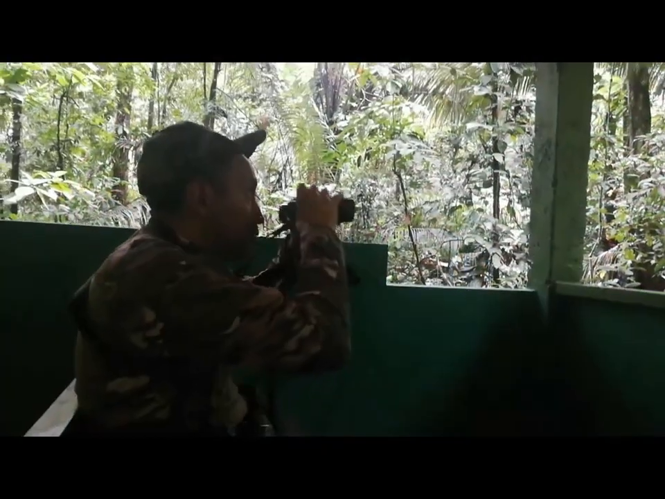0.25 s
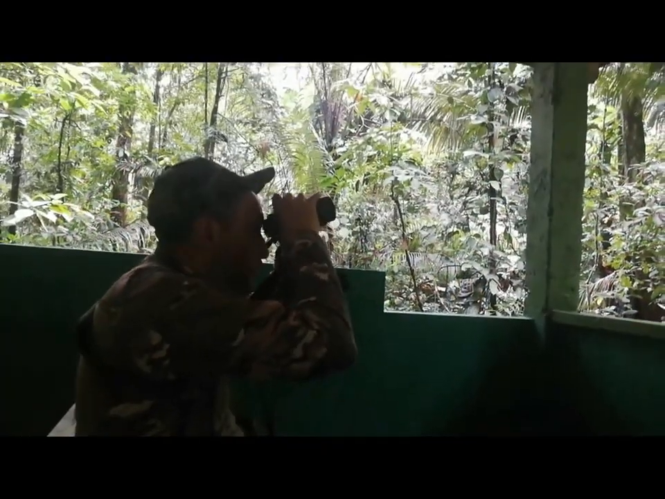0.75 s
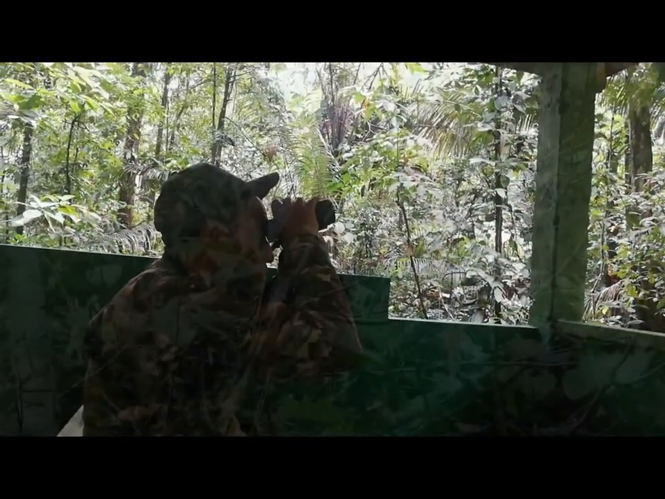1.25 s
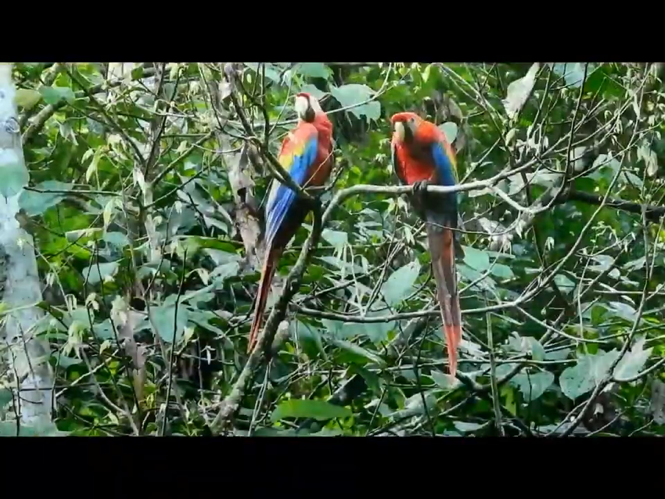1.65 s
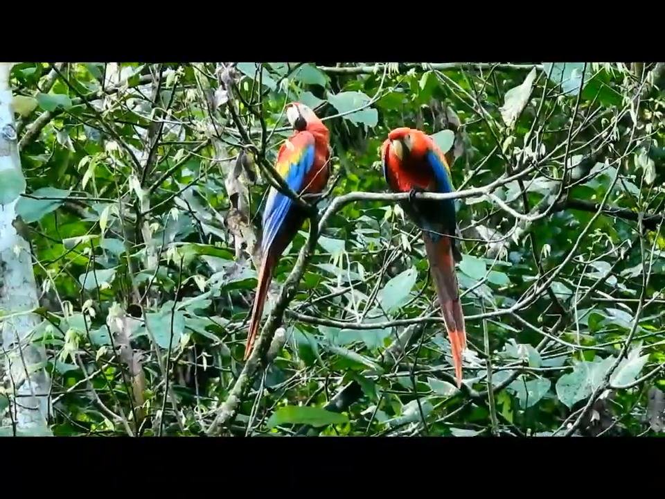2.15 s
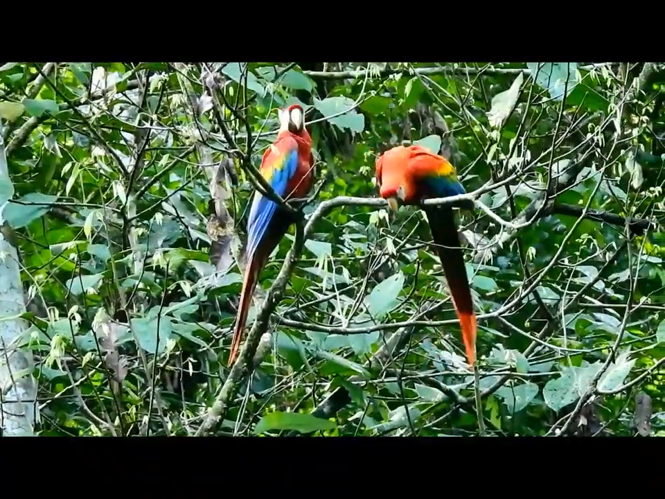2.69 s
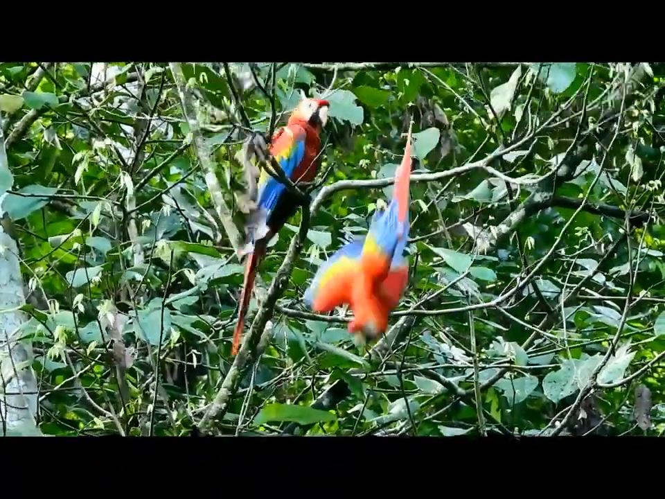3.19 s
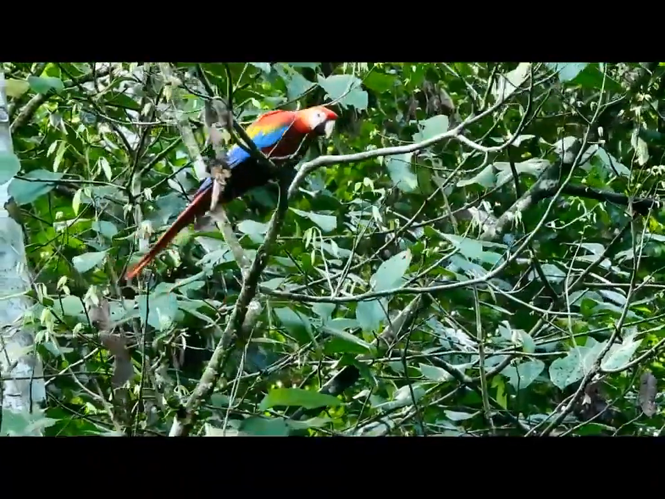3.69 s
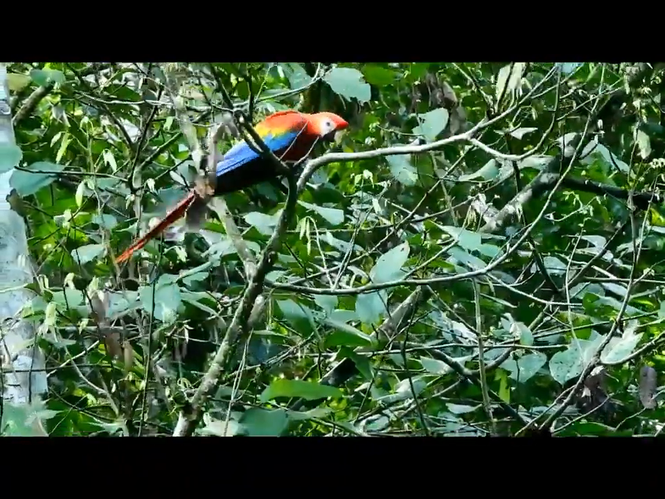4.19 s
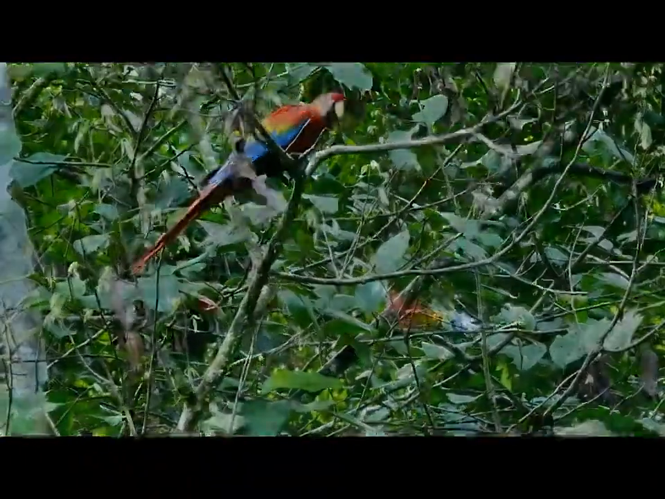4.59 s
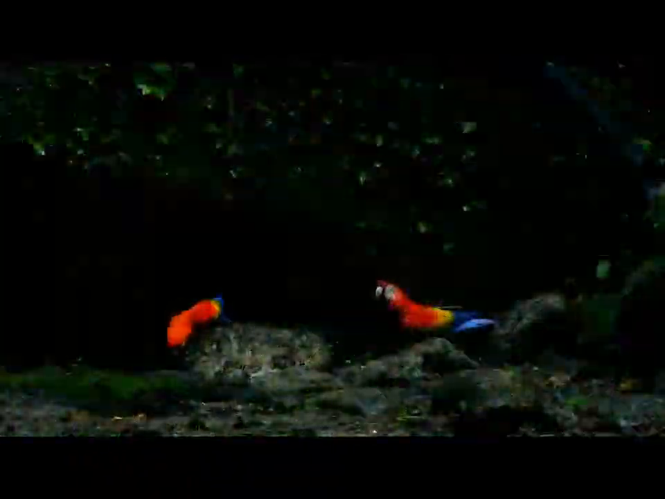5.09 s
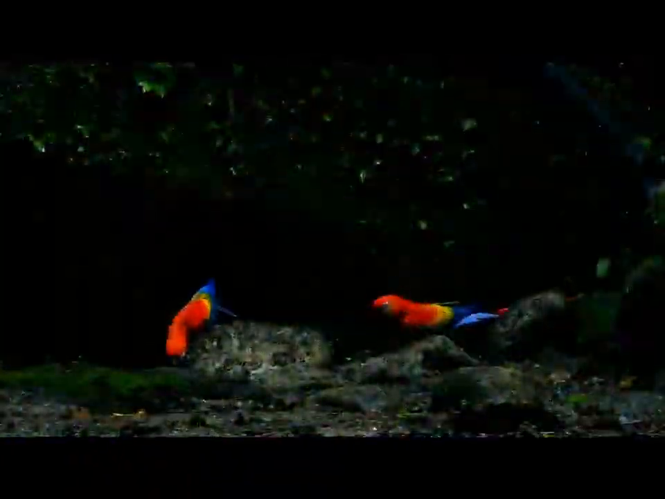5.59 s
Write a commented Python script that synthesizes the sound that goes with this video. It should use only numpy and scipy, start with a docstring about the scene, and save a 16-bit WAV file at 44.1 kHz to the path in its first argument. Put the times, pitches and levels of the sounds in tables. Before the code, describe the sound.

Wide stereo outdoor pickup in tropical forest. It starts quiet: airy insects, a soft snap, distant bird chatter on the right. The perspective then blends into a closer place with buzzing cicadas, murmur and low rumble. Shrill parakeet outbursts overlap, hoarse and ringing, strongest in the middle and at the end, broken by a calmer gap. Short whistles, chirps and low grating macaw croaks sit among them, with a brief diffuse forest echo.

```python
"""A flock of parakeets screeches in waves in a tropical forest: blurred ringing bands, hoarse noise and chirps.
Single birds whistle as gliding harmonic stacks, macaws croak as rough pulses, cicadas ring from dense clicks.
The first second is heard from a shelter, with a twig snap and the flock far to the right.
It cross-fades to a spot close under the birds, over shaped noise: a murmur, hiss and low rumble.
Trunks and leaves scatter every call into a short, wide tail."""
import sys
import numpy as np
from scipy import signal
from scipy.fft import rfft, irfft
from scipy.io import wavfile
from scipy.ndimage import uniform_filter1d

SR = 44100
rng = np.random.default_rng(int(sys.argv[2]) if len(sys.argv) > 2 else 0)


def dump_mix(stems):
    """Bounce the given channels to the path in sys.argv[1] as a 16-bit WAV at rate SR."""
    frames = np.atleast_2d(stems).T  # one column per channel
    limited = np.clip(frames, -1, 1)  # hard clip at full scale
    pcm = np.round(limited * 32767).astype(np.int16)
    wavfile.write(sys.argv[1], SR, pcm)


N = 257984
T = np.arange(N) / SR
CONTROL_STEP = 32  # samples between control points
CONTROL_T = T[::CONTROL_STEP]
FALL_DB_PER_S, TREBLE_FALL_DB_PER_S, BREATH_FALL_DB_PER_S = 54.5, 35, 71  # decay after an outburst's hold

# Outbursts of the flock: start_s, rise_s, hold_s, middle_start_hz, middle_end_hz (after the hold), low_start_hz,
# middle_db, low_db and high_db (re middle), screech_db, throat_db and treble_db (re screech)
OUTBURSTS = [(0.0, 0.0054, 1.14, 4350, 4300, 3034, -47, -8, -8.5, -53, 0, -10),
             (0.129, 0.053, 0.11, 4400, 4350, 3087, -41, -4, -13.5, -58, -8, -1),
             (.25, 0.062, 0.16, 4400, 4380, 2985, -49.5, -12, -8.5, -52.5, -20, -2),
             (.4, .04, 0.0496, 4462, 4363, 2971, -46, -14.5, -9, -55.5, -12, 1),
             (.55, 0.072, 0.13, 4300, 4300, 2916, -45, -11.5, -8, -64, -5, 11.5),
             (1.04, 0.15, 0.13, 4300, 4330, 2986, -41.5, -8.5, -3.5, -52, 6, 1),
             (1.534, 0.021, 0.062, 4400, 4350, 3080, -42, -18, -12.5, -33, -8.5, -8),
             (1.76, .07, .12, 4330, 4330, 3064, -38, -17, -8, -43.5, 3, -2),
             (1.948, 0.015, 0.0801, 4330, 4320, 2999, -30.5, -8, -5, -29.5, -4, -6),
             (2.01, .03, .07, 4349, 4346, 3147, -31, -2, -4, -34, -2, -1),
             (2.108, .04, .1, 4305, 4300, 2877, -25, -4, 0, -32, 1.5, 0.5),
             (2.19, 0.048, .07, 4295, 4240, 2950, -19, -11.5, -11.5, -27, -0.5, -1.5),
             (2.3, 0.042, .08, 4180, 4166, 2940, -22, -7.5, -9, -34.5, -3, -4),
             (2.538, 0.0096, .03, 4470, 4500, 3150, -25.5, -12.5, -4, -28, -0.5, -3),
             (2.565, .02, 0.063, 4524, 4435, 3098, -15, -18, -15, -31.5, 2.5, 5),
             (2.659, 0.039, 0.086, 4420, 4370, 3074, -19.5, -9.5, -6, -25.5, -0.5, -4),
             (2.8, 0.033, 0.074, 4304, 4314, 2960, -25, -8.5, -4.5, -36, 0, -15),
             (3.13, 0.13, .03, 4400, 4200, 3080, -23.5, -8, -5.5, -25, -3.5, -1.5),
             (3.299, 0.0479, 0.106, 4176, 4270, 3004, -31.5, -3, -4.5, -51.5, 5, -12),
             (3.595, .02, 0.065, 4330, 4314, 3225, -46, -12, 13, -37.5, -8, 3),
             (4.119, 0.014, 0.017, 4400, 4398, 3103, -41.5, -15.5, -10.5, -33.5, -7, 1),
             (4.15, 0.033, 0.039, 4560, 4395, 3144, -26, -7, -1.5, -37, 4, -0.5),
             (4.35, 0.084, .12, 4350, 4330, 3050, -42.5, -3.5, 2, -39, -1.5, -5),
             (4.54, 0.1464, 0.051, 4330, 4350, 3042, -27, -12.5, -4.5, -31, -1, -4),
             (4.8, .08, 0.087, 4350, 4250, 2988, -33, -3, -5, -32.5, -2.5, -8),
             (4.95, 0.13, 0.22, 4210, 4428, 2900, -20, -11.5, -2.5, -29, 0, 1),
             (5.3, 0.084, 0.25, 4330, 4400, 2966, -28.5, -6, -9, -25.5, -5.5, -10.5),
             (5.42, 0.056, 0.049, 4490, 4490, 2980, -28.5, -9.5, -11.5, -25, -10.5, -6.5),
             (5.55, 0.16, 0.067, 4442, 4450, 3038, -17.5, -12, -2, -25, -2.5, -3),
             (5.75, 0.059, 0.051, 4450, 4283, 2973, -14, -11.5, -9.5, -25, -3, -6)]
(START_S, RISE_S, HOLD_S, MIDDLE_START_HZ, MIDDLE_END_HZ, LOW_START_HZ,
 MIDDLE_DB, LOW_DB, HIGH_DB, SCREECH_DB, THROAT_DB, TREBLE_DB) = np.transpose(OUTBURSTS)


def flock():
    """Ringing voices near shared pitches, with hoarse screeches and chirps filling the gaps."""
    return ringing() + screeching()


def ringing():
    """Four unsteady voices per band, each a tone and its octave, beat together into a blurred ring."""
    slow_spread, fast_waver = 0.014, 0.02  # rms shares of pitch
    progress = np.clip((CONTROL_T - START_S[:, None]) / (RISE_S + HOLD_S)[:, None], 0, 1)
    glide = (MIDDLE_END_HZ / MIDDLE_START_HZ)[:, None] ** progress
    bands = [(LOW_START_HZ, MIDDLE_DB + LOW_DB, -20),
             (MIDDLE_START_HZ, MIDDLE_DB, -24),
             (2 * LOW_START_HZ, MIDDLE_DB + HIGH_DB, -45)]
    out = np.zeros(N)
    for start_hz, band_db, octave_db in bands:
        power = outburst_power(band_db, FALL_DB_PER_S)
        total_power = power.sum(axis=0)
        # weighting by power lets the loudest outburst of the moment set the pitch
        pitch_hz = control_to_audio((power * start_hz[:, None] * glide).sum(axis=0) / total_power)
        ring = np.zeros(N)
        for _ in range(4):
            voice_hz = pitch_hz * (1 + slow_spread * walk(7) + fast_waver * walk(300))
            phase = 2 * np.pi * np.cumsum(voice_hz) / SR
            flutter = undb(1.75 * walk(25.05) + 2.54 * walk(120))
            ring += flutter * (np.sin(phase) + undb(octave_db) * np.sin(2 * phase))
        out += level(ring, -3.96) * control_to_audio(np.sqrt(total_power))
    return out


# Noise bands of the screech, in the order main, lower throat, throat, treble: low_hz, high_hz
SCREECH_BANDS = [(4090, 6430), (2137, 3320), (2960, 4760), (5580, 7560)]


def screeching():
    """Rasping noise in four bands, a breathy top and a layer of chirps follow the outbursts."""
    main = outburst_gain(SCREECH_DB, FALL_DB_PER_S)
    throat = outburst_gain(SCREECH_DB + THROAT_DB, FALL_DB_PER_S)
    treble = outburst_gain(SCREECH_DB + TREBLE_DB, TREBLE_FALL_DB_PER_S)
    out = np.zeros(N)
    for (low_hz, high_hz), gain in zip(SCREECH_BANDS, [main, throat * undb(-9.5), throat, treble]):
        rasp = rng.standard_normal(N) * undb(1.23 * walk(60))
        out += level(band(rasp, low_hz, high_hz, order=3), -2.4) * gain
    # the breathy top shares its noise with the treble band but dies away faster
    breath = level(band(rasp, 8350, 9140, order=4), -17.5)
    breath += level(band(rasp, 8350, 11970, order=4), -26.5)
    out += breath * outburst_gain(SCREECH_DB + TREBLE_DB, BREATH_FALL_DB_PER_S)
    return out + chatter() * main * undb(-8)


def chatter():
    """Four hundred 20 ms chirps at random times, each falling to 0.82 of its first pitch."""
    out = np.zeros(N)
    progress = np.linspace(0, 1, int(0.02 * SR))
    for when, height, size in rng.random((400, 3)):
        hz = (4200 + 3000 * height) * 0.82 ** progress
        i = int(when * (N - len(progress)))
        chirp = np.sin(np.pi * progress) * np.sin(2 * np.pi * np.cumsum(hz) / SR)
        out[i:i + len(progress)] += undb(5 * size) * chirp
    return level(out, 0)


def outburst_power(db, fall_db_per_s):
    """Power of each outburst over time: linear rise in amplitude, hold, exponential fall."""
    t = CONTROL_T - START_S[:, None]
    after_hold = np.clip(t - RISE_S[:, None] - HOLD_S[:, None], 0, None)
    gain = np.clip(t / RISE_S[:, None], 0, 1) * undb(db[:, None] - fall_db_per_s * after_hold)
    return gain ** 2 + 1e-14


def outburst_gain(db, fall_db_per_s):
    """Overlapping outbursts add in power to one gain curve."""
    return control_to_audio(np.sqrt(outburst_power(db, fall_db_per_s).sum(axis=0)))


def control_to_audio(curve):
    """Draw straight lines between control points."""
    return np.interp(T, CONTROL_T, curve)


# Single calls: start_s, length_s, start_hz, end_hz, level_db (before hoarseness and filter),
# loudest_partial (number), fall_db_per_octave (either side of that partial)
CALLS = [(1.63, 0.029, 4000, 4000, -44, 1, 30), (1.814, 0.057, 2554, 2713, -48, 1, 22),
         (1.958, 0.0154, 5760, 3530, -36.5, 1, 31.5), (1.986, 0.01, 6830, 5520, -26.5, 1, 30),
         (2.022, 0.016, 6510, 5345, -25, 1, 37), (2.05, 0.017, 6600, 5220, -26.5, 1, 29),
         (2.123, 0.023, 4555, 4206, -23.5, 0.84, 26), (2.135, 0.118, 1467, 1446, -22.5, 4, 46),
         (2.155, 0.012, 5800, 4120, -26, 1, 27), (2.176, 0.026, 4550, 3230, -31, 1, 24.5),
         (2.201, 0.015, 5800, 4100, -33, 1, 29), (2.226, .02, 4760, 3420, -40, 0.9, 25),
         (2.257, .17, 1470, 1433, -37, 3.7, 33), (2.542, 0.021, 2356, 1997, -18, 2.8, 13.5),
         (2.555, 0.013, 6680, 6140, -29, 1, 28), (2.565, .045, 4454, 4665, -17.5, 0.71, -2),
         (2.607, .022, 7600, 5400, -20.5, 1, 30), (2.689, 0.16, 6540, 6760, -31, 1, 30),
         (2.764, 0.0176, 4960, 4263, -28, 0.66, 32), (4.121, 0.021, 1074, 1190, -32, 4.1, 6),
         (4.154, 0.019, 6920, 5710, -24.5, 1, 30), (4.174, 0.01536, 6530, 5230, -33, 1, 30),
         (4.193, 0.021, 4550, 4470, -31, 1, 30), (4.204, 0.021, 4400, 3243, -35, 1, 30),
         (4.222, 0.018, 2150, 2170, -41, 1.46, 17)]


def calls():
    """Whistles and falling chirps of single birds: gliding harmonic stacks, a little hoarse."""
    out, hoarse = np.zeros(N), walk(500)
    for start_s, length_s, start_hz, end_hz, level_db, loudest, fall_db in CALLS:
        progress = np.linspace(0, 1, int(length_s * SR))
        i, n = int(start_s * SR), len(progress)
        hz = start_hz * (end_hz / start_hz) ** progress * (1 + 0.014 * hoarse[i:i + n])
        partial = np.arange(1, int(10000 / max(start_hz, end_hz)) + 1)[:, None]
        # the throat passes little above 7 kHz
        throat_loss_db = 78 * np.clip(np.log2(partial * hz / 7000), 0, None)
        gain = undb(-fall_db * np.abs(np.log2(partial / loudest)) - throat_loss_db)
        stack = np.sum(gain * np.sin(partial * 2 * np.pi * np.cumsum(hz) / SR), axis=0)
        edges = np.clip(np.minimum(progress, 1 - progress) * length_s / 0.0021, 0, 1)  # 2.1 ms ramps
        out[i:i + n] += level(stack, level_db) * edges
    out *= undb(2 * walk(200))
    return band(out, 1700, 12000, order=3)  # small throats pass little bass


# Macaw croaks: start_s, length_s, pitch_hz, level_db (before the fade in and out), roughness (0-1),
# throat_hz, throat_width (ratio up and down)
CROAKS = [(0.209, 0.095, 470, -60, 0.44, 940, 1.125), (.42, 0.1, 399.4, -63, 0.63, 1120, 1.13),
          (1.49, 0.35, 398.4, -50, 0.65, 2055, 1.6), (2.951, 0.098, 554.6, -47, 0.65, 1143, 1.02),
          (3.01, 0.12, 538.6, -41.5, 0.48, 1271, 1.46), (3.109, 0.22, 529, -48.5, 0.61, 1475, 1.104),
          (4.119, 0.064, 397.6, -51.5, 0.77, 1506, 1.64), (5.447, 0.13, 410.8, -45, 0.36, 1310, 1.47),
          (5.54, 0.2, 299.9, -41, 0.31, 1238, 1.56)]


def macaws():
    """Jittered glottal pulses and breath noise through a wide throat resonance."""
    out, jitter, breath = np.zeros(N), walk(120), rng.standard_normal(N)
    for start_s, length_s, pitch_hz, level_db, rough, throat_hz, width in CROAKS:
        i, n = int(start_s * SR), int(length_s * SR)
        cycles = np.cumsum(pitch_hz * (1 + 0.11 * rough * jitter[i:i + n])) / SR
        pulses = level(np.diff(np.floor(cycles), prepend=0), 0)  # one pulse per whole cycle
        source = (1 - rough) * pulses + rough * breath[i:i + n]
        voice = band(source, throat_hz / width, throat_hz * width)
        out[i:i + n] += level(voice, level_db) * np.sin(np.linspace(0, np.pi, n)) ** 0.2
    return out


def twig():
    """A snapping twig: one click rings a short mode."""
    start_s, mode_hz, level_db, t60_s = 0.0887, 1900, -39.5, 0.021
    t = np.clip(T - start_s, 0, None)
    return undb(level_db) * np.exp(-np.log(1000) * t / t60_s) * np.sin(2 * np.pi * mode_hz * t)


# Cicada body modes: mode_hz, width_hz, level_db (before the slow swell)
CICADA_MODES = [(6490, 240, -41.5), (7570, 150, -45.5)]


def cicadas():
    """Dense clicks ring narrow body modes and swell slowly."""
    out = np.zeros((2, N))
    for mode_hz, width_hz, level_db in CICADA_MODES:
        clicks = rng.standard_normal((2, N)) * (rng.random((2, N)) < 0.05)
        body = band(clicks, mode_hz - width_hz / 2, mode_hz + width_hz / 2)
        out += level(body, level_db) * undb(1.5 * walk(3))
    return out


# Rumble, murmur and hiss under the trees: frequency_hz, relative_db (spectrum shape)
GROVE_SPECTRUM = [(15, -64.5), (25, -35), (32, -71), (155, -9), (346, -15), (733, -18), (941, -19.5),
                  (1070, -17.5), (3460, -17.5), (4330, -11), (6460, -2.5), (7700, -2), (9890, -33),
                  (12900, -73), (21800, -120)]
# Stereo likeness of that floor: frequency_hz, likeness (0 = independent, 1 = same left and right)
GROVE_LIKENESS = [(60, 0.55), (120, 0.089), (250, 0.77), (520, 0.56), (1080, 0.87), (2220, 0.87),
                  (4580, 0.21), (9440, 0.082)]
# Level swells of the 270-1700 Hz murmur, lower between them: centre_s, half_length_s, rise_db (above rest)
MURMUR_SWELLS = [(1.1, 0.52, 12), (2.05, 0.53, 8.5), (3.03, 0.17, 13), (3.7, 0.57, 4), (4.3, 0.99, 9.5),
                 (5.02, 0.25, 7.5), (5.6, 0.3, 13.5)]
# Low rumble swelling around the flock's loud outbursts: centre_s, half_length_s, rise_db (above rest)
RUMBLE_SWELLS = [(2.6, 0.79, 18.5), (3.25, 0.31, 10), (4.2, 0.31, 7), (4.85, 0.198, 7), (5.3, 0.28, 13)]


def grove():
    """Shaped noise makes the floor under the trees; its murmur and an added low rumble swell and sink."""
    murmur_rest_db, rumble_rest_db = -3.5, -80.5  # murmur re the floor
    floor = level(coloured(GROVE_SPECTRUM, GROVE_LIKENESS), -38) * undb(0.94 * walk(6.16))
    murmur_gain = undb(murmur_rest_db + swells(MURMUR_SWELLS))
    floor = floor + band(floor, 270, 1700, order=1) * (murmur_gain - 1)  # rescale the murmur band only
    rumble_spectrum = [(15, -35), (35, -11), (80, -6), (140, -18), (400, -81)]  # Hz, relative dB
    rumble = level(coloured(rumble_spectrum, [(20, 0.7), (100, 0.63)]), 0)
    rumble = rumble * undb(rumble_rest_db + swells(RUMBLE_SWELLS) + 2.14 * walk(5.4))
    return floor + rumble + cicadas()


def swells(events):
    """Smooth bumps in dB."""
    return sum(rise_db * np.cos(np.pi / 2 * np.clip((T - centre_s) / half_s, -1, 1)) ** 2
               for centre_s, half_s, rise_db in events)


# Insects and air at the shelter: frequency_hz, relative_db (spectrum shape)
SHELTER_SPECTRUM = [(15, -50), (30, -29), (60, -28.5), (130, -35.5), (500, -34.5), (1000, -29),
                    (1900, -24.5), (3000, -8.5), (3600, -16), (4300, -9), (6000, -27), (8100, -10.5),
                    (8700, -10), (9400, -14.5), (12900, -26), (15500, -75), (21800, -120)]


def shelter():
    """Steady noise shaped like insects and air, widest above the bass."""
    likeness = [(100, 0.72), (1000, 0.067), (10000, 0.071)]  # Hz, 0-1
    return level(coloured(SHELTER_SPECTRUM, likeness), -47.5)


def scatter(x, t60_s, wet_db, wide_db, wide_hz):
    """Direct sound, a shared noise tail, and a treble-weighted tail of opposite sign left and right."""
    t = np.arange(SR) / SR
    decay = np.exp(-np.log(1000) * t / t60_s) * np.clip(t / 0.0048, 0, 1)
    tails = rng.standard_normal((2, SR)) * decay
    tails /= np.sqrt(np.sum(tails ** 2, axis=1, keepdims=True))
    mid = x + undb(wet_db) * signal.fftconvolve(x, tails[0])[:N]
    side = undb(wide_db) * band(signal.fftconvolve(x, tails[1])[:N], wide_hz, 11200, order=1)
    return np.array([mid + side, mid - side])


def coloured(spectrum, likeness):
    """Stereo noise with a given spectrum and likeness of the channels."""
    log_hz = np.log(np.arange(1, N // 2 + 2) * SR / N)
    spectrum_hz, spectrum_db = np.transpose(spectrum)
    likeness_hz, likeness_share = np.transpose(likeness)
    gain = undb(np.interp(log_hz, np.log(spectrum_hz), spectrum_db))
    alike = np.clip(np.interp(log_hz, np.log(likeness_hz), likeness_share), 0, 1)
    mid = irfft(rfft(rng.standard_normal(N)) * gain * np.sqrt(1 + alike), N)
    side = irfft(rfft(rng.standard_normal(N)) * gain * np.sqrt(1 - alike), N)
    return np.array([mid + side, mid - side])


def walk(rate_hz):
    """Random levels held 1 / rate_hz seconds and slewed twice; rms 1."""
    k = max(int(SR / rate_hz), 1)
    held = np.repeat(rng.standard_normal(N // k + 1), k)
    return level(uniform_filter1d(uniform_filter1d(held, k), k)[:N], 0)


def band(x, low_hz, high_hz, order=2):
    """Band-pass."""
    return signal.sosfilt(signal.butter(order, [low_hz, high_hz], "band", fs=SR, output="sos"), x)


def level(x, db):
    """Set the rms level."""
    return x * undb(db) / np.sqrt(np.mean(x ** 2))


def undb(db):
    """dB to gain."""
    return 10 ** (np.asarray(db) / 20)


def scene():
    """Two listening spots, cross-faded: the shelter, then close under the birds."""
    fade_start_s, fade_end_s = 0.93, 1.75
    fade = np.clip((T - fade_start_s) / (fade_end_s - fade_start_s), 0, 1) * np.pi / 2
    birds = scatter(flock(), 0.18, -8.5, 1.37, 6450)
    birds = birds + scatter(calls() + macaws(), 0.5, 0.5, -0.55, 6800)
    far = birds + shelter()
    # from the right: the left port hears it 25 samples later and duller
    left = np.pad(signal.lfilter([0.6], [1, -0.45], far[0]), (25, 0))[:N]
    at_shelter = np.array([left, 1.345 * far[1]]) + twig()
    under_birds = birds + np.sin(fade) * grove()  # the grove enters more gradually than the birds
    return np.cos(fade) * at_shelter + np.sin(fade) * under_birds


def record(dry):
    """The recorder rounds the loudest peaks and cuts the top above 15.6 kHz."""
    rounded = 2 * np.tanh(dry / 2)
    return signal.sosfilt(signal.ellip(8, 0.2, 70, 15600, fs=SR, output="sos"), rounded)


dry = scene()
out = record(dry)
dump_mix(out)
```